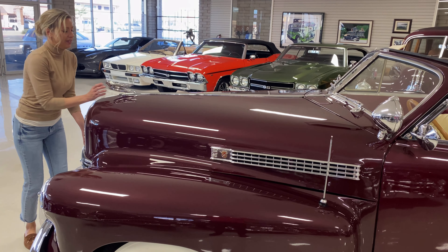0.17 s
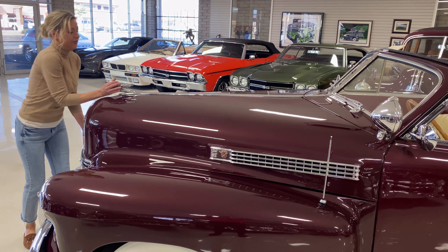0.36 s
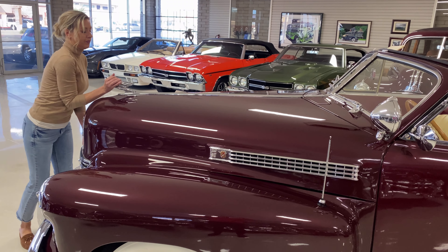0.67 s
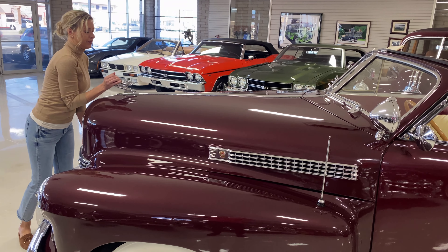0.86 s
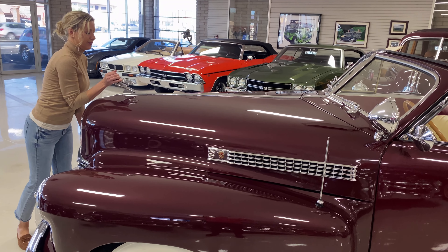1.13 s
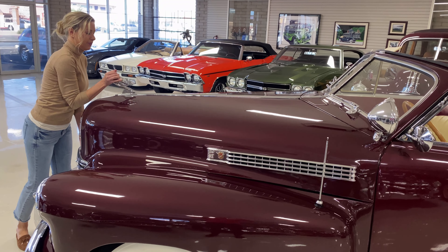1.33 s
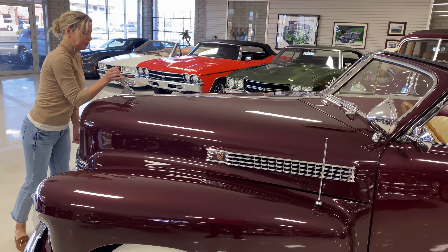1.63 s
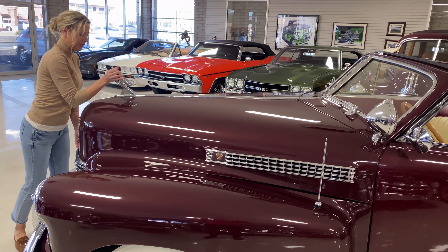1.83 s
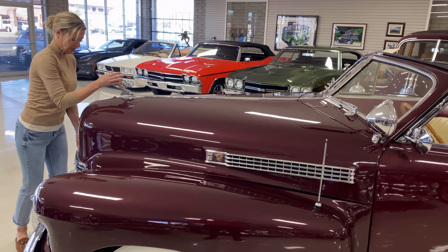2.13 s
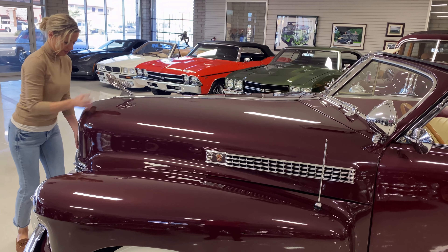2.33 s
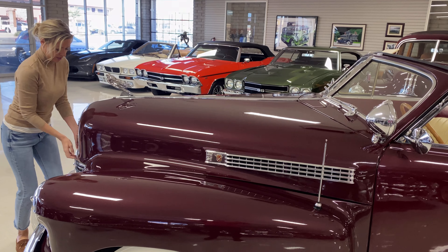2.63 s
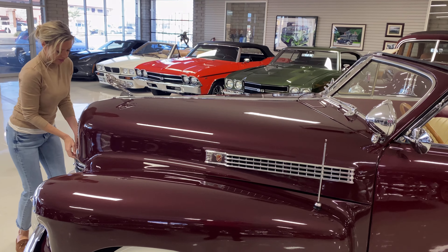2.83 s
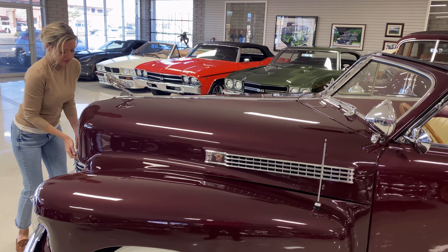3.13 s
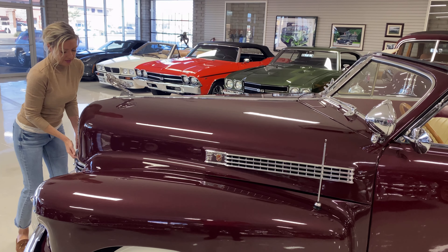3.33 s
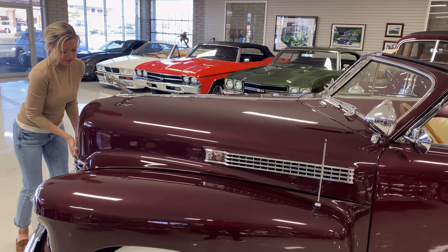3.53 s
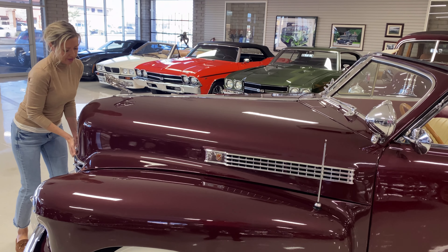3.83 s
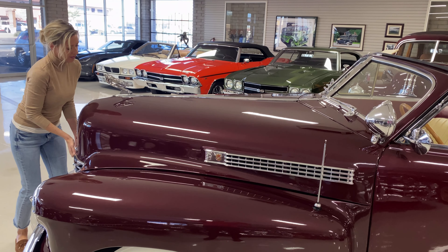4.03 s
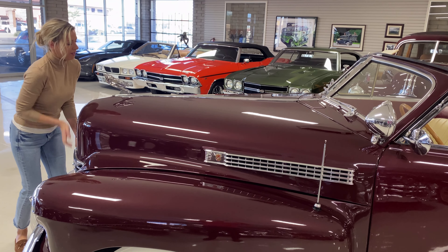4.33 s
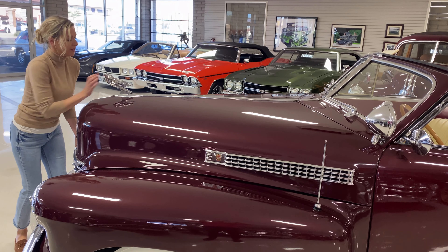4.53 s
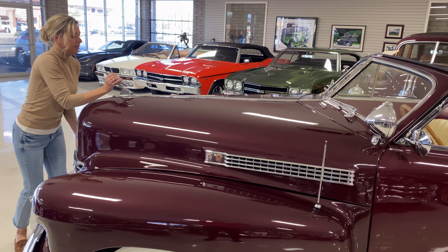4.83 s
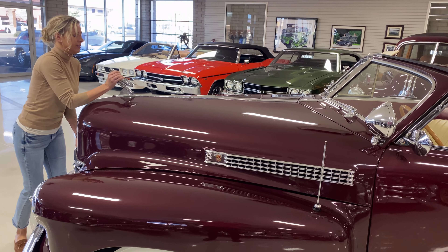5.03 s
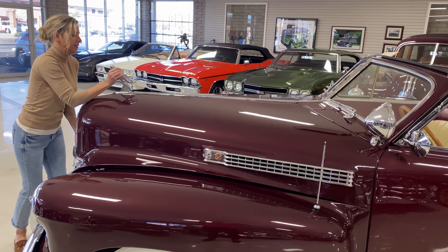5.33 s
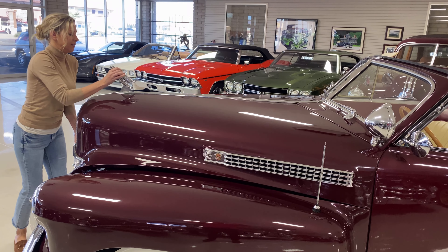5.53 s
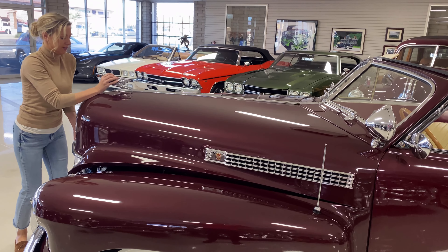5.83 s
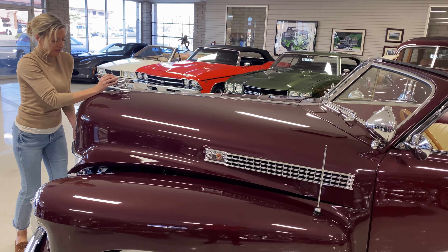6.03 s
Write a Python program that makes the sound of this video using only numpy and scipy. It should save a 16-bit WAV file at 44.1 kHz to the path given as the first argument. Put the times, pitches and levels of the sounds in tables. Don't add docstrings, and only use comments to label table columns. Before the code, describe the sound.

A large, hard-walled showroom holds a steady low ventilation rumble, with a muffled engine outside throbbing deeply and slowing throughout. Near a stereo microphone, a scrape and light latch clicks begin around 0.5 seconds; a sharper click at 0.73 comes with a juddering, springy lever tone and a dull drag. Small clicks follow at 1.1 and 1.4. At 1.56-1.76 the heavy steel hood jumps in a cluster of very loud clangs and booms, peaks flattened by overload, ringing into the hall. A weaker knock and click come near 2.0, then echoes fade to quiet rumble. From 3.55 to 3.95, clicks, soft panel thumps and short metallic notes return, with faint ticks at 4.3. A hard scrape and strong resonant clunk strike around 4.9-5.1. Thin squeaks follow, then bright catch snaps at 5.8-5.9, heavy dragging, and a dull settling thump at 6.0.

```python
import sys
import numpy as np
from scipy import signal
from scipy.fft import rfft, irfft, next_fast_len
from scipy.io import wavfile
from scipy.ndimage import uniform_filter1d

SR = 44100
rng = np.random.default_rng(int(sys.argv[2]) if len(sys.argv) > 2 else 0)


def volts(x):
    e = np.asarray(x, float) / 20
    return 10 ** e


def int16_out(signal):
    q = np.round(np.clip(np.atleast_2d(signal).T, -1, 1) * 32767)
    wavfile.write(sys.argv[1], SR, q.astype(np.int16))


N = 272979


def rms_one(x):
    return x / np.sqrt(np.mean(x ** 2) + 1e-20)


def in_time(rows):
    s, *columns = np.transpose(rows)
    return [np.interp(np.arange(N) / SR, s, column) for column in columns]


def at_hz(points, hz):
    table_hz, value = np.array(points).T
    return np.interp(np.log(hz + 1), np.log(table_hz + 1), value)


def drift(rate_hz):
    pole = np.exp(-80 * np.pi * rate_hz / SR)
    white = rng.standard_normal(N // 40 + 2002)
    slow = signal.lfilter([1], [1, -2 * pole, pole * pole], white)[2000:]
    return np.interp(np.arange(N) / 40, np.arange(len(slow)), rms_one(slow))


# frequency in Hz, correlation.
LIKENESS = [(60, .95), (260, .93), (550, .55), (1650, .1), (4000, .25), (7000, .74), (15000, .72)]


def stereo_bands(length, gain_of_band):
    out, edges_hz = 0, 20 * 2 ** np.arange(0, 10, .5)
    white = rng.standard_normal((2, 2, length))
    for k, (low, high) in enumerate(zip(edges_hz, edges_hz[1:])):
        band = signal.butter(2, [low, high], "band", fs=SR, output="sos")
        mid, side = signal.sosfilt(band, white[k % 2])
        hz = np.sqrt(low * high)
        alike = np.clip(at_hz(LIKENESS, hz), -1, 1)
        pair = np.sqrt(1 + alike) * mid + np.sqrt(1 - alike) * side * [[1], [-1]]
        out = out + gain_of_band(hz) * pair
    return out


# frequency in Hz, density in dB per Hz.
AIR_SPECTRUM = [(13, -41), (22, 14.5), (50, -19), (86, 3.5), (212, 0.5), (420, -9), (786, -7.5),
                (1320, -12.5), (2220, -25), (3430, -58.5), (7580, -57.5), (8930, -72.5), (9960, -66),
                (11700, -45.5), (15000, -90)]
# time in seconds, level in dB.
AIR_LEVEL = [(0, -40), (.5, -40.5), (1.3, -40), (2.6, -40), (3.3, -37.5), (4.3, -37), (4.8, -38),
             (6.19, -39.5)]


def air():
    level_db, = in_time(AIR_LEVEL)
    patchy_db = 1.5
    rumble = stereo_bands(N, lambda hz: volts(at_hz(AIR_SPECTRUM, hz) + patchy_db * drift(7.3)))
    return volts(level_db + 3.5) * rms_one(rumble)


# time in seconds, firing rate in Hz.
ENGINE_SPEED = [(0, 20.3), (1.3, 19.6), (2.2, 19.0), (2.5, 18.7), (3.1, 18.7), (3.4, 18.25), (3.7, 17.85),
                (4.0, 17.75), (4.3, 17.6), (4.6, 17.35), (6.19, 17.1)]
# time in seconds, load in dB, rasp in dB.
ENGINE_EFFORT = [(0, -49, 0), (1.0, -43, -26), (1.5, -34, -8.5), (2.0, -34.5, -6), (2.3, -32, -6.5),
                 (2.55, -34, -6.5), (2.8, -26, -12.5), (3.0, -32, -4), (3.2, -38.5, 1), (3.45, -37.5, -0.5),
                 (3.75, -33, -1.5), (4.1, -31.5, -8), (4.55, -26, -19), (4.95, -31, -10), (5.3, -34, 6.5),
                 (5.6, -36.5, -21), (5.85, -31.5, -28), (6.19, -47, -4)]
# multiple of the firing rate, level in dB, share of the rasp.
LOW_ORDERS = [(3, -3, .3), (4, 0, 0.032), (5, -0.5, .6)]
# multiple of the firing rate, level in dB.
UPPER_ORDERS = [(6, -8), (7, -8), (8, -4), (9, -9), (10, 0), (11, -8), (12, -14), (13, -14)]
# frequency in Hz, gain in dB.
THROUGH_GLASS = [(50, -5.5), (56, 1), (62, 3), (70, 2), (78, -2.5), (87, 5), (93, -4.5), (99, 5.5)]


def engine():
    firing_hz, = in_time(ENGINE_SPEED)
    load_db, rasp_db = in_time(ENGINE_EFFORT)
    phase = 2 * np.pi * np.cumsum(firing_hz) / SR
    orders = []
    for k, db, share in LOW_ORDERS:
        orders.append((k, db + share * rasp_db + at_hz(THROUGH_GLASS, k * firing_hz)))
    for k, db in UPPER_ORDERS:
        orders.append((k, rasp_db + db + 2.5 * drift(2.5)))
    out = 0
    for k, db in orders:
        wander_rad = .6 * drift(3.7) + rng.uniform(0, 2 * np.pi)
        out = out + volts(load_db + db) * np.sin(round(k) * phase + wander_rad)
    return np.sqrt(2) * out


# start in seconds, pitch in Hz, level in dB.
SINGS = [(.495, 683, -30), (0.532, 560, -28), (.70, 713, -15), (0.724, 253, -22.5), (.74, 524, -20.5),
         (1.07, 5200, -36), (1.50, 4425, -42.5), (1.556, 500, -23), (1.566, 720, -4), (3.582, 1311, -21),
         (3.59, 3044, -35.5), (3.585, 419, -21), (3.60, 325, -24.5), (3.63, 261, -20), (3.818, 183, -30.5),
         (3.638, 3203, -30), (3.73, 334.4, -25), (4.244, 1328, -29.5), (4.86, 3060, -27),
         (4.92, 6610, -30.5), (4.992, 1146, -10), (4.991, 234.5, -5), (4.992, 186, -5.5),
         (5.01, 640, -12.5), (4.994, 125.3, -3), (5.019, 1283, -7.5), (5.028, 77.5, -10.5),
         (5.042, 1764, -19), (5.827, 6870, -22.5), (5.925, 5260, -28.5), (5.95, 698.4, -18.5)]
# start in seconds, pitch in Hz, level in dB, t60 in seconds.
PINGS = [
    (1.134, 1360, -25, .3),
    (3.86, 1123, -35.5, .33),
    (5.828, 3250, -25, .1),
]


def notes():
    touched = [(s, hz, db, .095 * (1000 / hz) ** .72, 1) for s, hz, db in SINGS]
    lever = [(.675 + .066 * k, 645 + 1.4 * k, -20 - 2.5 * k, .3, 1) for k in range(5)]
    free = [(*ping, .55) for ping in PINGS]
    return touched + lever + free


def singing_parts():
    out, t = np.zeros(N + SR), np.arange(SR // 2) / SR
    for s, hz, level_db, t60_s, share in notes():
        white = rng.standard_normal((2, len(t)))
        blur = share * rms_one(uniform_filter1d(white, size=round(14 * SR / hz), axis=1))
        note = (1 + 0.24 * blur[0]) * np.sin(2 * np.pi * hz * t + 1.31 * blur[1])
        envelope = volts(level_db + 4.0 - 60 * t / t60_s) * (1 - np.exp(-t / 0.00058))
        first = round(s * SR)
        out[first:first + len(t)] += envelope * note
    return out[:N]


def modes(table):
    hz, level_db, t60_s = np.transpose(table)
    t60_s = np.clip(t60_s, .001, 1.4)
    t = np.arange(round(t60_s.max() * SR))[:, None] / SR
    response = (volts(level_db - 60 * t / t60_s) * np.sin(2 * np.pi * hz * t)).sum(axis=1)
    return response / np.sqrt(np.sum(response ** 2))


def crowded_modes(spectrum, cycles, count):
    low, high = np.log(spectrum[0][0]), np.log(min(spectrum[-1][0], .45 * SR))
    hz = np.exp(low + (high - low) * (np.arange(count) + rng.random(count)) / count)
    level_db = at_hz(spectrum, hz) + 20 * np.log10(hz) + rng.normal(0, 0.75, count)
    return modes(np.transpose([hz, level_db, cycles / hz]))


def grit(per_s, spread_db):
    sizes = volts(spread_db * np.minimum(rng.exponential(1, N), 4)) * rng.choice([-1, 1], N)
    return rms_one(sizes * (rng.random(N) < per_s / SR))


# start in seconds, strength in dB, passed to the panel in dB,
# edge in dB.
CLICKS = [(0.617, -38.5, 2, -9.5), (0.6435, -17.5, -3.5, -23.5), (0.681, -16.5, -3.5, -39),
          (0.7267, -5, -20, -22), (1.07, -31, -29, -23), (1.1307, -20.5, -37, -49.5),
          (1.4107, -21.5, -35, -16), (1.5014, -31, -28, -35.5), (2.0097, -15, -23.5, -19.5),
          (3.5506, -42.5, -1, -22), (3.6153, -13.5, -9.5, -20), (3.645, -12, -6.5, -25.5),
          (3.7286, -24.5, 2.5, -28.5), (3.8012, -21.5, -4.5, -32.5), (3.9405, -37, 5, -42),
          (4.2453, -38.5, -6, -30), (4.3157, -38.5, -2.5, -19), (4.7296, -37, 1.5, -45),
          (4.8557, -16, 1, -33), (5.3274, -49.5, 16, -12), (5.542, -35.5, -9.5, -17),
          (5.6405, -38, -1.5, -14.5), (5.7806, -22, -17, -40.5), (5.824, -9.5, -32, -14),
          (5.916, -13.5, -9, -7.5), (5.9243, -8, -7.5, -18)]
# start in seconds, strength in dB, weight in dB, edge in dB.
THUMPS = [(0.4923, -50, 29.5, -45), (1.5598, 2, -22, -12.5), (1.5696, 6, 1.5, -6), (1.5955, 2.5, -1, -10.5),
          (1.6303, 2.5, 6, -18), (1.6563, -7, -1, -3), (1.6881, -20, -2, -17), (1.7594, -8, 3, -27),
          (1.828, -24, 9, -43), (1.865, -20, 8.5, -30), (2.0502, -17, 3.5, -14.5),
          (3.5807, -25.5, 12, -26.5), (3.6975, -29.5, 10, -25), (3.8814, -30, 4, -34.5),
          (4.9163, -16.5, -9, -6.5), (4.984, -7.5, -9, -14), (4.9907, -4.5, -6.5, -21),
          (5.0195, -12, -9.5, -26), (5.0814, -22, 10, -31), (5.0994, -23.5, 16.5, -30),
          (6.0135, -13.5, -25, -19), (6.048, -24, 0, -37)]


def blows():
    out = []
    for s, db, panel_db, edge_db in CLICKS:
        out.append((s, db, -12 + 0.14 * panel_db, panel_db, edge_db, 0.0047 * volts(-0.33 * db)))
    for s, db, weight_db, edge_db in THUMPS:
        panel_db = -9.5 - 0.53 * db
        out.append((s, db, weight_db, panel_db, edge_db, 0.0082))
    return out


def shakes(rise_s):
    force, t = np.zeros((4, N + SR // 4)), np.arange(SR // 4) / SR
    slow_rise = np.array([[1.0], [3.0], [1.3], [.6]])
    slow_fall = np.array([[1.0], [1.2], [1.3], [.6]])
    for s, clang_db, boom_db, panel_db, tick_db, rattle_s in blows():
        rise = (1 - np.exp(-t / (rise_s * slow_rise))) ** 2
        fall = np.exp(-t / (np.clip(rattle_s, .002, .06) * slow_fall))
        level = volts(clang_db + np.array([[1.5], [boom_db + 13.5], [panel_db + 5.5], [tick_db + 8.0]]))
        first = round(s * SR)
        force[:, first:first + len(t)] += level * rise * fall
    return force[:, :N]


# start, hardest and end in seconds, drag in dB, brightness in dB.
DRAG = [
    (0.508, 0.675, .78, -41, 10.5),
    (0.71, 0.838, 1.1, -35.5, -8.5),
    (3.42, 3.547, 4, -42, 9),
    (3.6, 3.85, 2, -50, -15),
    (4.83, 4.967, 5.25, -31.5, 6.5),
    (5.087, 5.349, 5.58, -39.5, 17.5),
    (5.639, 5.72, 5.85, -36, 16.5),
    (5.716, 5.898, 6.0, -29.5, -2.5),
    (5.95, 6.088, 6.3, -32, -11),
]
# frequency in Hz, density in dB per Hz.
CLANG = [(530, -7.5), (900, -3.5), (1190, 0), (1330, -5), (1650, 3), (2590, -11.5), (6000, -40),
         (7800, -43), (13200, -120)]
# frequency in Hz, level in dB, t60 in seconds.
BOOM = [(74.8, -21, .4), (103.6, -18, 0.14), (124, -7, .3), (123.86, 4.5, 0.8), (134.8, -6, 0.76),
        (154.8, -4, .3), (160.1, -3.5, 0.84), (173, -1.5, 0.46), (180.6, -1.5, 0.17), (192.5, -4, .3),
        (209, 0.5, 0.37), (220.3, -2, 0.39), (234.9, -4.5, 0.37), (249.5, -5.5, 0.74), (263.5, -10, 0.66),
        (281, -20.5, 0.092)]
# frequency in Hz, level in dB, t60 in seconds.
PANEL = [(308, -16.5, 0.034), (386, -10, 0.082), (382, -15, 0.087), (493, -9, 0.058), (504.7, 0, 0.11),
         (560, 4, 0.051), (640, -1.5, 0.033), (640, -7.5, 0.027), (640, -3, 0.12), (716.3, -1.5, 0.15),
         (773.6, -5, 0.13), (854, -5, 0.028), (953, 0, .04), (1078, -4, 0.092)]
# frequency in Hz, density in dB per Hz.
TICK = [(3000, -25.5), (4200, -1), (7000, -1.5), (9000, 3), (11200, -3), (14000, -3.5), (15700, -21.5)]


def hood():
    force, t = shakes(rise_s=0.0032), np.arange(N) / SR
    slip_db = 0.41 * (drift(25) + drift(25) + drift(25))
    for start, hardest, end, level_db, bright_db in DRAG:
        drag_db = level_db + slip_db + np.interp(t, [start, hardest, end], [-17, 0, -17])
        families_db = [drag_db + bright_db / 2 - 3.0, drag_db + 10.5,
                       drag_db + .1, drag_db + bright_db - 25.5]
        force += volts(families_db) * (t > start) * (t < end)
    clang = crowded_modes(CLANG, cycles=11, count=200)
    tick = crowded_modes(TICK, cycles=34, count=200)
    out = 0
    for push, body in zip(force, [clang, modes(BOOM), modes(PANEL), tick]):
        out = out + signal.fftconvolve(push * grit(5000, spread_db=2.5), body)[:N]
    return out


# frequency in Hz, t60 in seconds.
HALL = [(60, 0.37), (160, 0.5), (420, 1.625), (1100, 1.62), (2910, 1.35), (7680, 0.57), (15000, 0.33)]


def hall(x, onset_s, early_db, early_s, thin_hz, dull_hz):
    t, out = np.arange(3 * SR // 2) / SR, 0

    def band_decay(hz):
        loss = np.sqrt((1 + (hz / dull_hz) ** 2) * (1 + (thin_hz / hz) ** 4))
        return volts(-60 * t / max(at_hz(HALL, hz), .2)) / loss

    for k in range(3):
        echoes = stereo_bands(len(t), band_decay)
        echoes *= (1 - np.exp(-t / onset_s)) * (1 + volts(early_db) * np.exp(-t / early_s))
        echoes /= np.sqrt(np.sum(echoes ** 2) / 2)
        turn = np.sqrt(2 / 3) * np.abs(np.cos(np.pi * (np.arange(N) / SR / .11 + k / 3)))
        out = out + signal.fftconvolve((turn * x)[None], echoes, axes=1)[:, :N]
    return out


def scene():
    panel, parts = hood(), singing_parts()
    echoes = hall(panel + volts(-7.5) * parts, onset_s=0.004, early_db=5.0, early_s=0.035,
                  thin_hz=130, dull_hz=7500)
    direct = panel + volts(1.0) * parts
    return volts(-4.5) * direct + volts(-4.0) * echoes + engine() + air()


def top_cut(x):
    return signal.sosfilt(signal.butter(12, 15900, fs=SR, output="sos"), x)


# frequency in Hz, left minus right in dB.
LEAN = [(60, 3.0), (240, 4), (950, 1.5), (3770, 3), (15000, 1)]
# frequency in Hz, lead of the left port in radians.
LEAD = [(0, 0), (700, 0), (1640, .8), (2200, .5), (5500, 1.0), (7300, 0), (8400, -2.9), (9500, -3.4),
        (10800, -6.1), (11700, -6.5), (12700, -8.6), (14000, -10.3), (15400, -12.56), (17000, -14)]


def record(dry):
    size = next_fast_len(N + SR // 10)
    hz = np.arange(size // 2 + 1) * SR / size
    lean = volts(at_hz(LEAN, hz) / 2) * np.exp(.5j * at_hz(LEAD, hz))
    ports = irfft(rfft(dry, size) * [lean, 1 / lean], size)[:, :N]
    ports = signal.sosfilt(signal.butter(2, 38, "high", fs=SR, output="sos"), ports)
    knee = 40.0
    flattened = ports / (1 + np.abs(ports) ** knee) ** (1 / knee)
    return top_cut(flattened)


dry = scene()
out = record(dry)
int16_out(out)
```